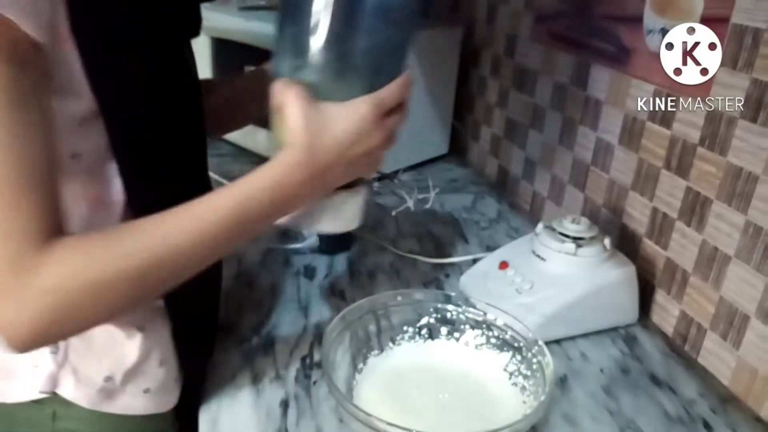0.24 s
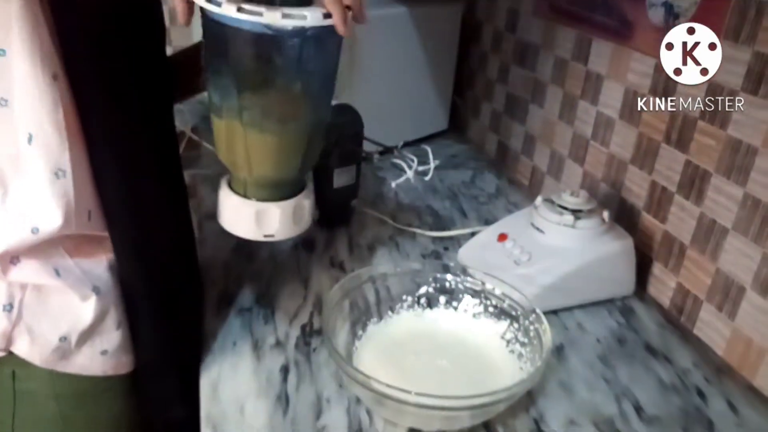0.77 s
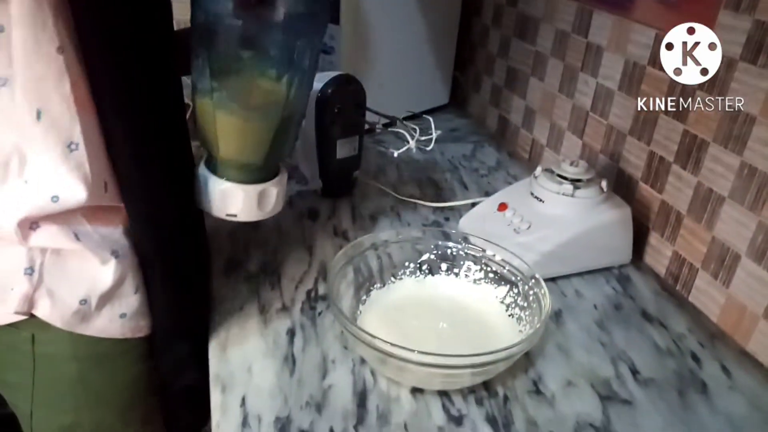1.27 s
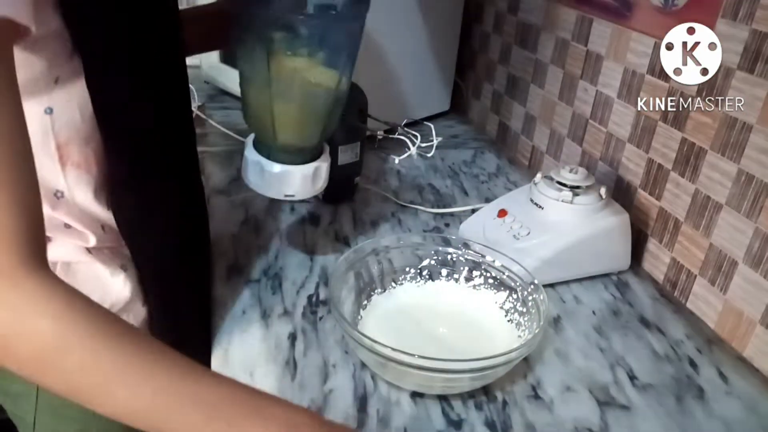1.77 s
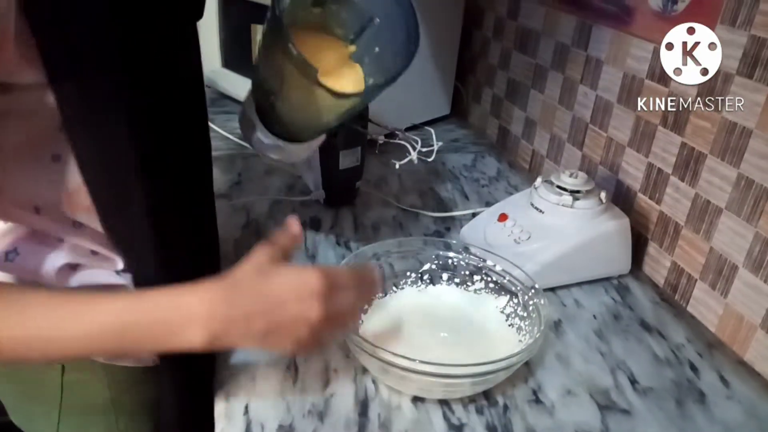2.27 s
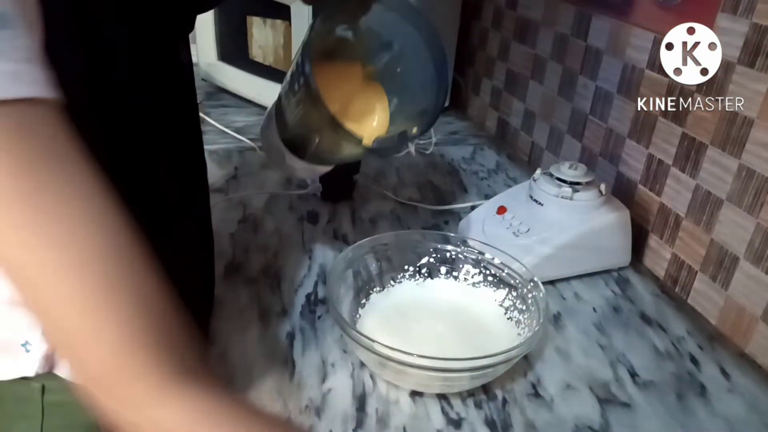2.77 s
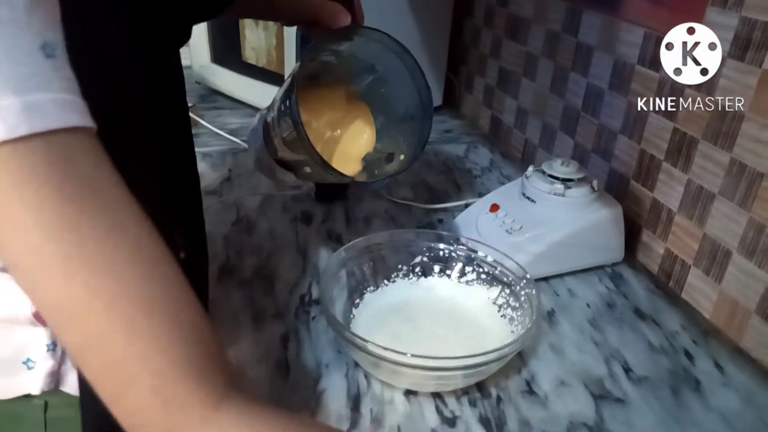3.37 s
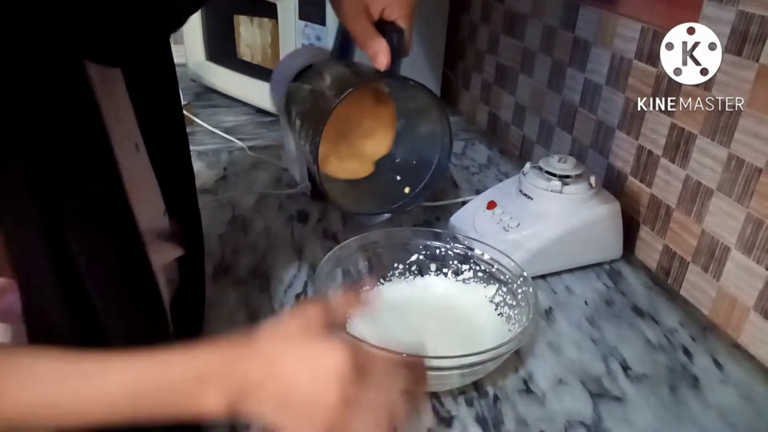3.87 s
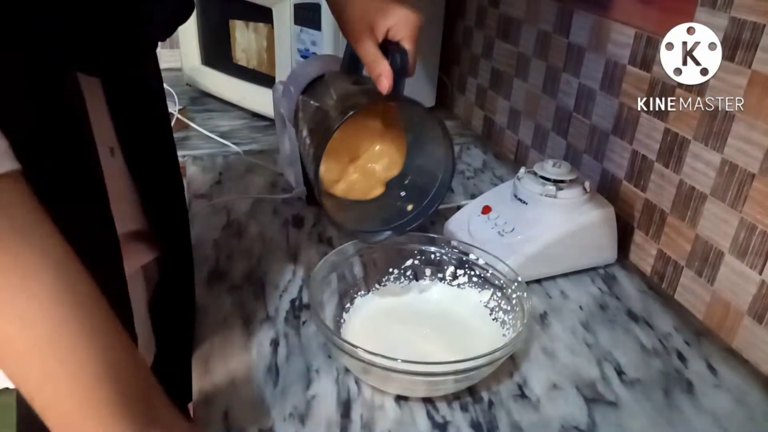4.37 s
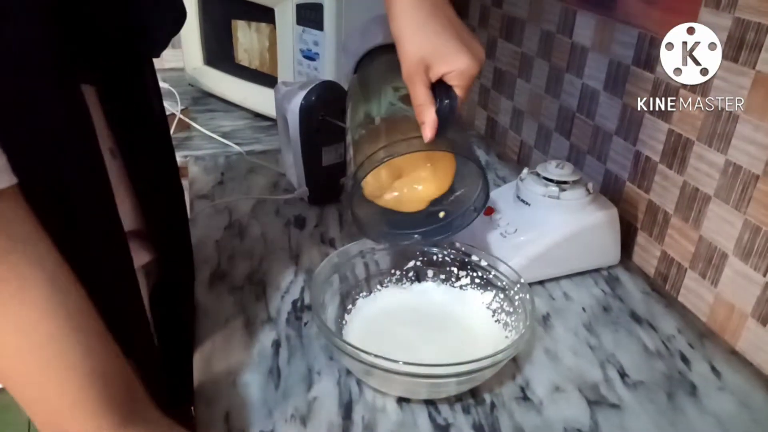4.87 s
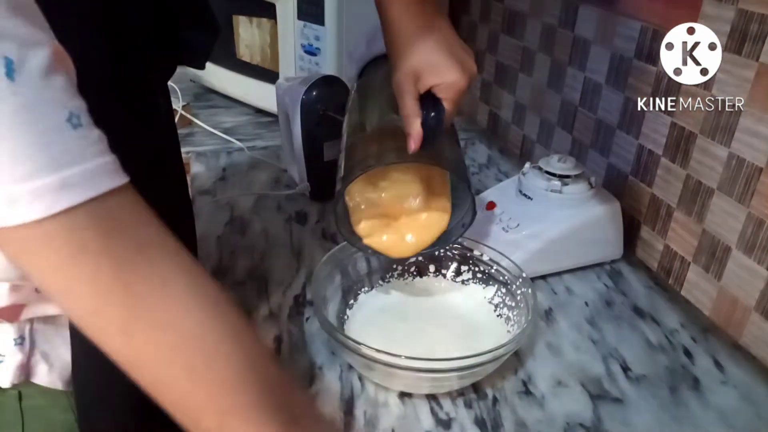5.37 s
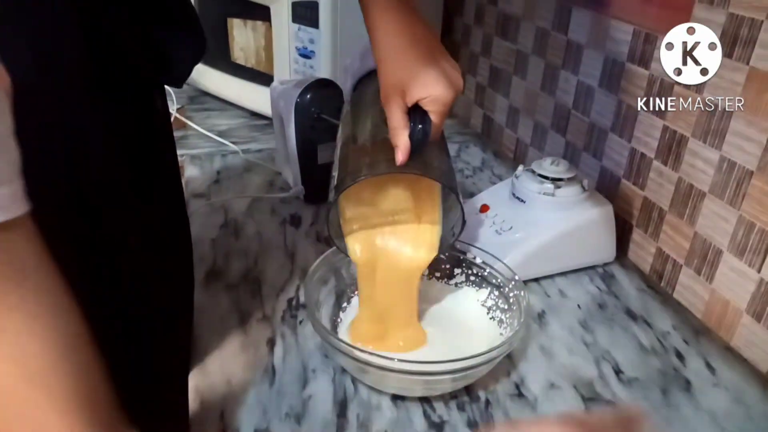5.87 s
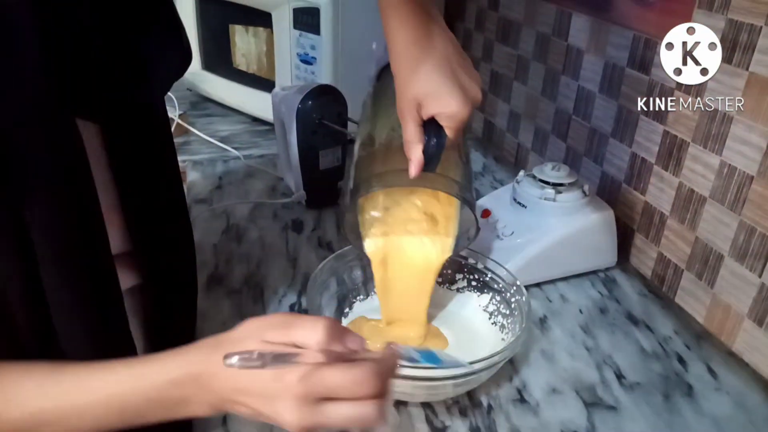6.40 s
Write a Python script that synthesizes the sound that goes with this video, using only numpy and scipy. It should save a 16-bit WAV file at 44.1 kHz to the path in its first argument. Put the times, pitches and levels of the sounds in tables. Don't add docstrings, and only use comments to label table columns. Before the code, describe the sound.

In a small tiled kitchen with a very faint appliance hum, a plastic lid twists on a jar with gritty rubs, quick cracks and a hollow low boom. It claps hard on stone. After a pause, cutlery ticks softly, then a steel spoon strikes and bounces loudly on the counter. Later it scrapes up, rattles down again more briefly and gives small clinks. Close phone-like microphone, short room reflections.

```python
import sys
import numpy as np
from scipy import signal
from scipy.io import wavfile
from scipy.ndimage import uniform_filter1d

SR = 44100
rng = np.random.default_rng(int(sys.argv[2]) if len(sys.argv) > 2 else 0)


def materialize(psi):
    bounded = np.clip(np.atleast_2d(psi).T, -1, 1)
    quanta = np.round(bounded * 32767).astype(np.int16)
    wavfile.write(sys.argv[1], SR, quanta)


def gain_from_db(level_db):
    decades = np.asarray(level_db, float) / 20
    return 10 ** decades


N = 292812

# [f/Hz, density/dB per Hz]
AIR_SPECTRUM = [(15, -50), (25, -17.5), (86, -2), (189, -9), (324, -9), (414, -12), (542, -11.5),
                (672, -17), (1930, -20.5), (2330, -23.5), (2900, -18.5), (3230, -15), (3500, -23.5),
                (3900, -26.5), (4210, -19), (8050, -35), (15800, -42)]
WHINE_HZ = [1922, 2616, 2810, 2885, 3058, 3257, 3212, 4145, 4339, 4441, 5475, 6060, 6611]
# [width/Hz, early level/dB, late level/dB]
WHINE_LINES = [(11, -100, -87.5), (30.3, -90, -91.5), (15, -94, -93), (15, -90, -91), (12, -91.5, -95.5),
               (10, -82.5, -80.5), (22, -81, -81.5), (20, -84, -88), (12, -100, -93.5), (12, -96.5, -90),
               (10, -95.5, -92.5), (20, -98.5, -97), (30, -96, -99)]
# [t/s, level/dB]
PIPE_LEVEL = [(0, -95.5), (2.2, -96), (2.6, -83), (3.6, -86.5), (4.4, -83.5), (5.2, -79.5), (6.64, -81.5)]
# [t/s, peak/dB]
BUMPS = [(0.02, -75), (0.33, -68), (0.51, -75), (0.961, -61.5), (1.1, -58), (1.9, -58), (2.251, -72),
         (2.9, -71), (3.028, -61), (3.201, -66), (3.47, -68.5), (3.79, -68), (3.87, -59), (3.98, -62),
         (4.079, -61), (4.22, -71), (4.42, -75), (4.76, -69), (5.12, -68.5), (5.631, -67.5), (6.2, -66),
         (6.35, -60), (6.521, -73)]
# [t/s, peak/dB, f/Hz, width/Hz, t60/s]
HANDLING = [(0.386, -58, 201, 152, 0.11), (0.498, -50.5, 50, 60, 0.11), (1.722, -60, 668, 58.7, 0.097),
            (1.725, -68.5, 1880, 300, 0.079), (1.843, -55.5, 3870, 1510, 0.033),
            (2.209, -67, 4035, 2158, 0.27), (2.494, -51.5, 130.5, 100.7, 0.069),
            (2.546, -68.5, 1580, 300, 0.27), (3.1, -73.5, 1738, 625, 0.16), (3.886, -52, 1156, 505, 0.18),
            (3.87, -58, 197, 89, 0.18), (4.238, -64, 61.3, 49.4, 0.41), (4.41, -48.5, 90.1, 68.2, 0.066),
            (4.791, -59.5, 3133, 911, 0.062), (4.972, -65.5, 2277, 1490, .15),
            (4.98, -69, 4690, 1200, 0.27)]

TWISTS = [
    (0.284, -42.5, -15, 11.5),
    (0.6725, -54, 17, 10),
    (0.9796, -39.5, -9, 12),
    (1.055, -31.5, -19, 0),
    (1.0727, -46, -17, 18),
    (1.0915, -48, -17, -6),
    (1.1205, -32, -15, -4.5),
    (1.1568, -37.5, -2.5, 17),
]
# [t/s, length/s, rub/dB, jar boom/dB, bright share 0-1]
STROKES = [
    (0.281, 0.071, -59.5, -66.5, 0.9),
    (0.669, 0.043, -57, -46.5, 0),
    (0.96, 0.2, -62.5, -52.5, 0.07),
    (1.045, 0.052, -45, -43.5, 0.03),
    (1.083, 0.0026, -67, -28, 0.2),
    (1.117, 0.014, -45, -35.5, 0.33),
    (1.144, 0.058, -123, -51.5, 0.7),
]
SLIPS = [(1.0915, -44.5, 8, 0), (1.0553, -43, 4, 1.5), (1.063, -36, 1, -4), (1.0727, -42.5, -3, -4),
         (1.1205, -42, -1.5, -0.5), (1.128, -43.5, -7, 0.5), (1.136, -46, -13, -2), (1.1568, -43.5, 4, 2.5),
         (1.161, -43, -0.5, 3), (0.674, -50, 1, 0), (0.69, -53, 6, -3)]
CLAPS = [
    (1.8658, 1.7, -1.5, .1),
]
TICKS = [
    (3.341, -33, 2.7, 0.00084),
]
TOCKS = [
    (3.391, -32, 3.3, -6),
]
SNAPS = [
    (3.758, -12, -2, 0),
]
KNOCKS = [
    (3.7925, -15, -2, -1.5),
]
FLICKS = [
    (3.8789, -21.5, -0.5, 4),
    (3.907, -32, -5.5, 3.4),
]
RATTLE = [(3.977, -26.5, 1.5, -13.5), (3.9805, -8, -3.5, 1), (3.987, -16, 1, -6), (4.0025, -5.5, 3.7, -3.5),
          (4.008, -10.5, -3, -2), (4.0155, -5, -5.5, -3.5), (4.0185, -5.5, 4, 4.5), (4.027, -20.5, -1, 2),
          (4.047, -4.5, -4.5, 4.5), (4.053, -15, 2, 2), (4.067, -17, -1.5, -0.5), (4.084, -15.5, 1.5, 2),
          (4.097, -19, 3, -5.5), (4.109, -16.5, 3, 0.5), (4.118, -39, -3.5, -6)]
LIFT = [
    (5.3055, -40, 3.5, -3),
    (5.309, -30, 7.2, 1.5),
    (5.3426, -50, 11, -13),
]
SETTLE = [
    (5.403, -29.5, 4.5, -7),
    (5.4115, -17.5, -4.5, -5),
    (5.4145, -15.5, 2, 2.5),
    (5.419, -10, -3, 2),
    (5.424, -15, -22, 5.5),
    (5.428, -18.5, -12.5, -6),
    (5.433, -11, 2.5, 4.5),
    (5.437, -17, 0.5, 3.5),
    (5.441, -28, 10, -9),
    (5.4455, -24.5, -1, -10.5),
]
CLINKS = [
    (5.523, -44, -3, -1.2),
    (5.5415, -31, 7.5, 0),
    (5.5622, -26, 7, 0.89),
]
# [t/s, loss/dB]
TOUCHES = [
    (3.868, 12),
    (3.994, 4),
    (4.042, 8),
    (4.119, 10),
    (5.329, 9),
    (5.4315, 4),
    (5.449, 13),
]

# [f/Hz, density/dB per Hz]
TWIST_COLOUR = [(150, -32), (450, 2.5), (800, 3), (1800, -3), (3500, -6.5), (6200, -26), (7300, -37.5),
                (15500, -84)]
# [f/Hz, density/dB per Hz]
CLAP_COLOUR = [(120, -48), (450, -14), (820, -9.5), (1290, 0.5), (1700, -9), (2180, -5), (2900, -10),
               (4200, -5), (5600, -19), (6500, -16), (8200, -33.5), (13000, -42), (15500, -56)]
# [f/Hz, density/dB per Hz]
TICK_COLOUR = [(400, -52), (900, -16.5), (2200, -3.5), (3700, 5), (6300, -7.5), (7200, -28), (15500, -77)]
# [f/Hz, density/dB per Hz]
SNAP_COLOUR = [(240, -58.5), (400, -23.5), (1130, -5), (1320, -2), (2030, -7), (2360, -3.5), (3680, -3),
               (4030, 0), (4840, 0.5), (10400, -12.5), (13500, -10), (15500, -8)]
# [f/Hz, density/dB per Hz]
RATTLE_COLOUR = [(200, -45.5), (500, -27.5), (1000, -13.5), (1800, -11.5), (2800, -10.5), (3450, -3.5),
                 (4200, -12), (5100, -17), (5800, -7), (6500, -16.5), (7300, -38.5), (13000, -34),
                 (15500, -43)]

# [f/Hz, level/dB, t60/s]
JAR = [(300, 1, 0.73), (316, 16, 0.42), (440, -19, 0.065), (511, -12, 0.24), (631, 5, 0.17),
       (720, -26, 0.19), (1310, 7, 0.042), (1760, -11, 0.039)]
# [f/Hz, level/dB, t60/s]
THREAD = [(1030, 4, .04), (1745, -5, 0.16), (2090, 5, 0.024), (2550, -2.5, 0.04), (3300, -13, .04),
          (3512, -6.5, 0.045), (4400, -1, 0.034), (5450, -3, 0.046), (6000, -9, 0.03)]
# [f/Hz, level/dB, t60/s]
NECK = [(1050, -6, .06), (1745, 0, .11), (3600, -5, .06), (5900, -11, .04), (6200, -13, .04)]
# [f/Hz, level/dB, t60/s]
LID = [(200, -31.5, .15), (560, -15, .04), (900, -11, .03), (1130, -7, .035), (1257, -7, .04),
       (1449, -9, .04), (1650, -10, .03), (1950, -3, .03), (2092, 2, .04), (2225, 0, .045),
       (2525, -8, .035), (3062, -8, .025), (3420, -6, .03), (4050, -4, .02), (4300, -8, .025),
       (4940, -10, .025), (14920, -45, .034)]
# [f/Hz, level/dB, t60/s]
CUTLERY = [(1050, -4, 0.05), (2240, 1.5, 0.096), (3180, -8, 0.16), (3603, -8, 0.089), (4295, -16.5, 0.14),
           (5034, -20.5, 0.099), (5477, 1, 0.062), (6547, -20, 0.18), (8080, -9.5, 0.081),
           (11180, -28, 0.046)]
# [f/Hz, level/dB, t60/s]
FORK = [(1200, -18, 0.11), (1806, -3.5, 0.066), (2340, 0, 0.07), (2060, -3, .05), (2440, -6.5, 0.19),
        (3240, -10.5, 0.27), (3640, 2.5, 0.066), (4660, -10.5, 0.044), (5590, -12, .04), (8064, -30, .06)]
# [f/Hz, level/dB, t60/s]
HANDLE = [(1350, -5, .04), (1900, -6, .04), (2794, -7, .12), (3273, -3, .08), (4800, -3, .03),
          (5362, -2, .14), (6180, -10, .07), (7000, -9, .03), (7919, -9, .06), (8845, -10, .05),
          (9800, -10, .03), (12470, -18, .08), (13290, -20, .1), (14700, -24, .12)]
# [f/Hz, level/dB, t60/s]
BLADE = [(1453, -8, .08), (2336, -2, .06), (2783, -9, .1), (3268, -9, .09), (3700, 0, .035),
         (4662, 0, .045), (5356, -17, .7), (6212, -10, .08), (6982, -12, .06), (7951, -7, .035),
         (9000, -12, .03), (10580, -20, .06), (12240, -24, .1), (14760, -24, .1)]
# [f/Hz, level/dB, t60/s]
TIP = [(1077, -14, .19), (3600, -3, .025), (4048, 0, .03), (5300, -5, .03), (6400, -10, .03),
       (7025, -4, .035), (7865, -9, .03), (8489, -12, .04), (9410, -8, .04), (11320, -17, .08),
       (12440, -19, .1), (14700, -19, .055)]
# [f/Hz, level/dB, t60/s]
SPOON = [(1450, -13, .05), (3376, -2, .12), (3407, -4, .12), (3385, -21, 1.7), (3440, -9, .08),
         (3515, -6, .11), (4090, -15, .14), (4880, -20, .06), (5572, -.5, .11), (5560, -33, 1.0),
         (5630, -9, .07), (6035, -11, .07), (6270, -12, .055), (6650, -24, .06), (8110, -34, .13),
         (8990, -29, .08), (9800, -36, .06), (11048, -29, .2), (12800, -28, .045), (14305, -27, .16),
         (14690, -42, .06)]
# [f/Hz, level/dB, t60/s]
BOWL = [(1087, -5, .1), (1000, -9, .04), (1906, -4, .07), (1990, -7, .05), (1500, -11, .03),
        (2885, -8, .05), (3050, -8, .04), (3429, -7, .1), (3558, -1, .08), (4091, -6, .08), (5600, -6, .04),
        (5766, -5, .04), (6200, -7, .04), (8200, -30, .05), (9900, -30, .06), (11250, -36, .03)]
# [f/Hz, level/dB, t60/s]
HELD = [(1750, -13, .05), (1900, -12, .06), (2500, -13, .06), (3410, 0, .16), (3500, -6, .06),
        (3585, -6, .12), (4140, -12, .1), (4883, -18, .08), (5590, -3, .1), (5900, -9, .05),
        (6223, -14, .06), (8150, -33, .4), (11060, -27, .4), (12800, -34, .12), (14310, -27, .3)]
# [f/Hz, level/dB, t60/s]
RIM = [(1104, -12, .08), (1860, -19, .1), (3413, -6, .2), (3596, 0, .075), (3900, -14, .04),
       (4167, -22, .15), (5658, -19, .08), (8130, -36, .12), (9060, -37, .043), (11040, -38, .12)]
# [f/Hz, t60/s]
ROOM_T60 = [(250, .38), (600, .33), (1100, .44), (2000, .41), (4000, .36), (5600, .32), (7700, .23),
            (11000, .16), (15000, .13)]
# [f/Hz, gain/dB]
MIC_RESPONSE = [(25, -16), (70, 1), (13900, 0.5), (14400, 8.5), (15300, 10), (15700, -17), (16600, -29.5)]

AIR_DB = -68
RUMBLE_DB, DRONE_DB, WHINE_DB = -77.5, -73.5, -1.5
BUMP_S, TOUCH_S = 0.04, 0.004
GRIP_S, LET_GO_T60_S = 0.0052, 0.104
TILT_HZ = (1100, 7500)
LATE_DB, LATE_STRETCH = -11, 1.75


def unit_rms(x):
    return x / np.sqrt(np.mean(x ** 2) + 1e-20)


def read(points, hz):
    f, value = np.transpose(points)
    return np.interp(np.log(hz + 1), np.log(f + 1), value)


def add(mix, start_s, sound):
    part = mix[round(start_s * SR):][:len(sound)]
    part += sound[:len(part)]


def causal(gain_db):
    log_gain = np.log(gain_from_db(np.maximum(gain_db, gain_db.max() - 84.5)))
    mirrored = np.r_[log_gain, log_gain[-2:0:-1]]
    spectrum = np.exp(np.conj(signal.hilbert(mirrored)))
    return np.fft.ifft(spectrum).real[:len(gain_db)]


def fuzzy(hz, width_hz, size=N):
    r = np.exp(-np.pi * width_hz / SR)
    noise = rng.standard_normal((size, 2)) @ [1, 1j]
    slow = signal.lfilter([1], [1, -2 * r, r * r], noise)
    carrier = np.exp(2j * np.pi * hz * np.arange(size) / SR)
    return unit_rms((slow * carrier).real)


def air():
    frames = N // 256 + 5
    hz = np.fft.rfftfreq(1024, 1 / SR)
    real, imag, patches = rng.standard_normal((frames, 513, 3)).T
    patches = uniform_filter1d(patches, 10, 0)
    patches = unit_rms(uniform_filter1d(patches, 14, 1))
    z = (real + 1j * imag) * gain_from_db(read(AIR_SPECTRUM, hz)[:, None] + 1.5 * patches)
    tone = signal.istft(z, nperseg=1024, noverlap=768)[1][:N]
    return gain_from_db(AIR_DB - 7) * unit_rms(tone)


def appliance():
    t = np.arange(N) / SR
    waver = uniform_filter1d(rng.standard_normal((len(WHINE_LINES) + 3, N // 100 + 1)), 90, 1)
    waver = uniform_filter1d(np.repeat(unit_rms(waver), 100, 1)[:, :N], 1500, 1)
    casing_high, casing_low, load = waver[-3:]

    level = gain_from_db(RUMBLE_DB)
    for s, db in BUMPS:
        level = level + gain_from_db(db - 6.0) * np.exp(-((t - s) / BUMP_S) ** 2)
    flutter = unit_rms(load - uniform_filter1d(load, 6000))
    level = level * gain_from_db(2.5 * np.tanh(load) + 2.6 * flutter)
    out = level * (fuzzy(115, 80) + 0.35 * fuzzy(215, 42))

    drone = gain_from_db(4.0 * np.tanh(casing_low) - 4.0) * fuzzy(300, 24)
    drone += gain_from_db(3.0 * np.tanh(casing_high) - 3.0) * fuzzy(340, 36)
    out += gain_from_db(DRONE_DB) * drone
    out += gain_from_db(np.interp(t, *np.transpose(PIPE_LEVEL)) + 4.0) * fuzzy(544, 19)
    for hz, (width_hz, early_db, late_db), wobble in zip(WHINE_HZ, WHINE_LINES, waver):
        level_db = np.linspace(early_db, late_db, N) + WHINE_DB + 3.0 * wobble
        out += gain_from_db(level_db) * fuzzy(hz, width_hz)
    return out


def kitchen(x):
    taps = np.zeros((3, SR))
    at = np.arange(100, SR - 20, 20) + rng.integers(0, 20, (3, (SR - 101) // 20))
    np.put_along_axis(taps, at, rng.choice([-1., 1.], at.shape), 1)
    hz, t, z = signal.stft(taps, SR, nperseg=256)
    fall_db = -60 * t / read(ROOM_T60, hz)[:, None]
    decay = gain_from_db(fall_db) + gain_from_db(LATE_DB + fall_db / LATE_STRETCH)
    tail = signal.istft(z * decay, SR, nperseg=256)[1]
    turn = np.arange(N) / SR * 31 + np.arange(3)[:, None] * np.pi / 3
    fed = x * np.cos(turn) * np.sqrt(2 / 3)
    return signal.fftconvolve(fed, tail / np.linalg.norm(tail[0]), axes=1)[:, :N].sum(0)


def handling():
    out, t = np.zeros(N), np.arange(SR // 3) / SR
    for s, db, hz, width_hz, t60_s in HANDLING:
        envelope = gain_from_db(db - 60 * t / t60_s) * (1 - np.exp(-t / 0.0036))
        add(out, s, envelope * fuzzy(hz, width_hz, size=len(t)))
    return out


def blows(rows, colour, modes, scatter_db, t60_s, free, click=0.46, chatter_db=3.0, lean=1.0, others=(),
          contact_s=0.00034, last_s=0.25):
    cracks, rings = np.zeros((2, N))
    hz, t = np.fft.rfftfreq(4096, 1 / SR), np.arange(round(SR * last_s)) / SR
    for (s, db, ring_db, tilt), struck in zip(rows, list(others) + [modes] * len(rows)):
        burst = rng.standard_normal(len(t)) * gain_from_db(-60 * t / t60_s)
        burst[0] = click * np.linalg.norm(burst)
        colour_db = read(colour, hz) + tilt * np.log2(np.clip(hz, *TILT_HZ) / 3000)
        crack = signal.fftconvolve(burst, causal(colour_db))[:len(t)]

        mode_hz, mode_db, mode_t60_s = np.transpose(struck)[:, :, None]
        spot, phase, detune = rng.standard_normal((3, len(struck), 1))
        level_db = mode_db + scatter_db * spot - 60 * t / (free * mode_t60_s)
        level_db += lean * tilt * np.log2(np.clip(mode_hz, 2200, 6000) / 3000)
        cycles = mode_hz * (s + (1 + 0.0008 * detune) * t) + 0.12 * phase
        ring = (gain_from_db(level_db) * np.sin(2 * np.pi * cycles)).sum(0)
        ring *= 1 - np.exp(-(t / contact_s) ** 2)
        ring *= np.minimum((last_s - t) / 0.05, 1)
        chatter = uniform_filter1d(uniform_filter1d(rng.standard_normal(len(t)), 45), 45)
        ring *= gain_from_db(chatter_db * unit_rms(chatter))
        for at_s, loss_db in TOUCHES:
            if at_s > s:
                ring *= gain_from_db(-loss_db * np.clip((s + t - at_s) / TOUCH_S, 0, 1))

        add(cracks, s, gain_from_db(db - 8.5) * crack / abs(crack).max())
        add(rings, s, gain_from_db(db - 10.0 + ring_db) * ring / abs(ring).max())
    return np.array([cracks, rings])


def hidden_cutlery():
    return blows(TICKS + TOCKS, TICK_COLOUR, CUTLERY, scatter_db=0.5, t60_s=0.024, free=0.62, click=0.35,
                 chatter_db=0.9, others=[CUTLERY, FORK], contact_s=0.0006)


def lid_rubbing():
    rubs, booms = np.zeros((2, N))
    hz, t = np.fft.rfftfreq(4096, 1 / SR), np.arange(SR // 3) / SR
    octaves = np.log2(np.clip(hz, 100, 5000) / 2000)
    for s, length_s, rub_db, boom_db, bright in STROKES:
        lumps = unit_rms(uniform_filter1d(rng.standard_normal(len(t)), 90))
        grit = rng.standard_normal(len(t)) * gain_from_db(4.5 * lumps)
        dull, sharp = (unit_rms(signal.fftconvolve(grit, causal(read(TWIST_COLOUR, hz) + tilt * octaves))[:len(t)])
                       for tilt in (0.5, 9))
        force = np.minimum(t / GRIP_S, 1) * gain_from_db(-60 * np.maximum(t - length_s, 0) / LET_GO_T60_S)
        rub = np.sqrt(1 - bright) * dull + np.sqrt(bright) * sharp
        add(rubs, s, gain_from_db(rub_db - 9.5) * force * rub)
        boom = fuzzy(330, 48, size=len(t)) + 0.9 * fuzzy(450, 110, size=len(t))
        add(booms, s, gain_from_db(boom_db - 7.0) * force * unit_rms(boom))
    return np.array([rubs, booms])


def lid_twist():
    cracks_rings = blows(TWISTS, TWIST_COLOUR, JAR, scatter_db=3.5, t60_s=0.02, free=0.7, click=0.7)
    return cracks_rings + lid_rubbing()


def thread_slips():
    return blows(SLIPS, TWIST_COLOUR, THREAD, scatter_db=4.0, t60_s=0.022, free=0.9, click=0.25, lean=2.0,
                 last_s=0.12, others=[NECK])


def lid_clap():
    return blows(CLAPS, CLAP_COLOUR, LID, scatter_db=0.1, t60_s=0.012, free=0.75, click=5.0, chatter_db=0.6)


def spoon_ends():
    return blows(SNAPS + KNOCKS + FLICKS, SNAP_COLOUR, TIP, scatter_db=0.5, t60_s=0.018, free=0.55, click=0.4,
                 chatter_db=2.0, others=[HANDLE, BLADE])


def spoon_rattle():
    return blows(RATTLE, RATTLE_COLOUR, SPOON, scatter_db=1.2, t60_s=0.018, free=0.66, click=0.3,
                 chatter_db=2.1, lean=2.2, last_s=0.55)


def spoon_lift():
    return blows(LIFT, TICK_COLOUR, BOWL, scatter_db=0.8, t60_s=0.025, free=0.65, click=0.1, chatter_db=3.5,
                 contact_s=0.0015)


def spoon_settle():
    return blows(SETTLE, RATTLE_COLOUR, HELD, scatter_db=1.2, t60_s=0.025, free=0.5, click=0.2,
                 chatter_db=2.2, lean=1.6)


def rim_clinks():
    return blows(CLINKS, RATTLE_COLOUR, RIM, scatter_db=0.5, t60_s=0.02, free=0.6, click=0.5, chatter_db=0.4)


def scene():
    # source, room send/dB of [crack, ring]; rings are beamed, so walls hear less of them
    sources = [(lid_twist(), [-10.5, -14]), (thread_slips(), [-9, -12]), (lid_clap(), [0.3, -11.5]),
               (hidden_cutlery(), [-7.5, -11]), (spoon_ends(), [-7.5, -12]), (spoon_lift(), [-8.5, -14]),
               (spoon_rattle(), [-10, -12]), (spoon_settle(), [-9, -15]), (rim_clinks(), [-8.5, -11])]
    faint = handling()
    near = sum(sound.sum(0) for sound, send_db in sources) + faint
    sent = sum(gain_from_db(send_db) @ sound for sound, send_db in sources) + gain_from_db(-13.0) * faint
    return (near + kitchen(sent) + air() + appliance())[None]


def top_cut(x):
    return signal.sosfilt(signal.butter(12, 16640, fs=SR, output="sos"), x)


def record(dry):
    response = causal(read(MIC_RESPONSE, np.fft.rfftfreq(4096, 1 / SR)))
    heard = signal.oaconvolve(dry, response[None])[:, :N]
    return top_cut(heard)


dry = scene()
out = record(dry)
materialize(out)
```